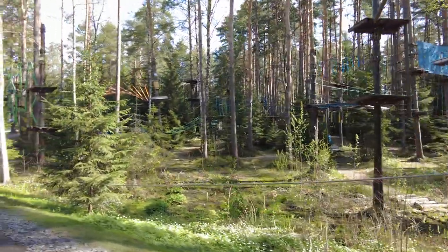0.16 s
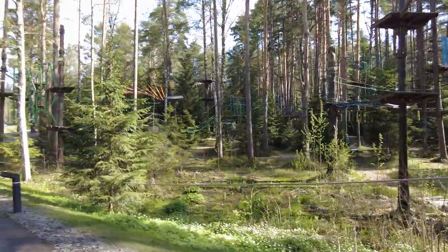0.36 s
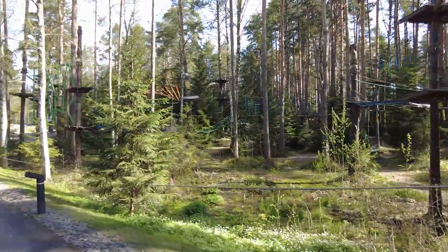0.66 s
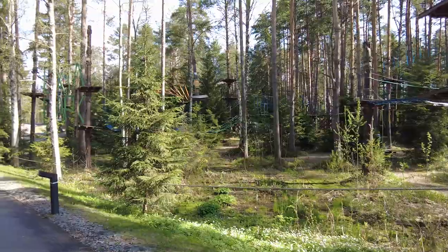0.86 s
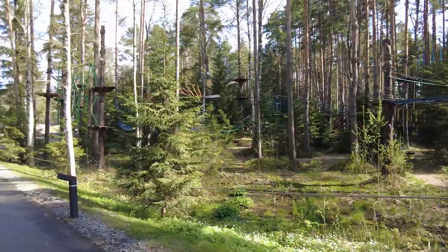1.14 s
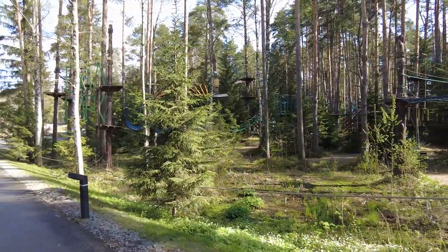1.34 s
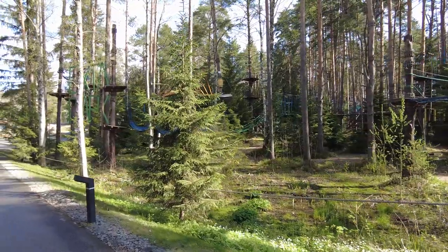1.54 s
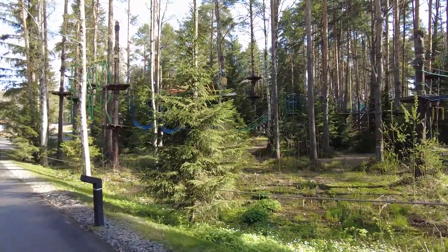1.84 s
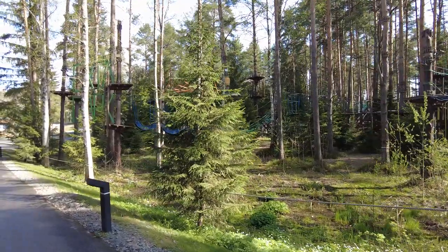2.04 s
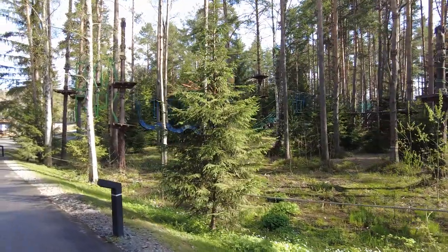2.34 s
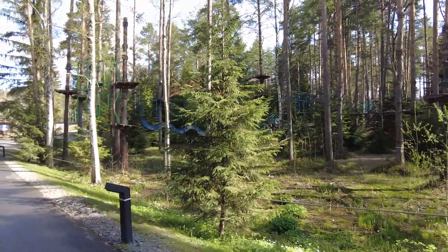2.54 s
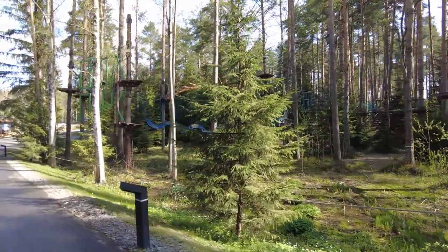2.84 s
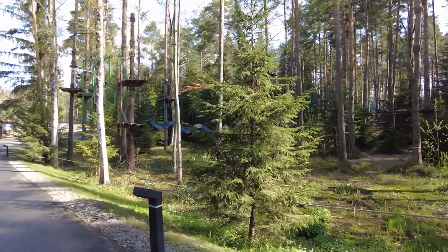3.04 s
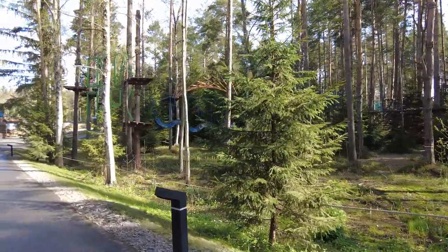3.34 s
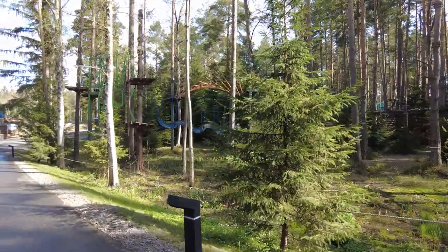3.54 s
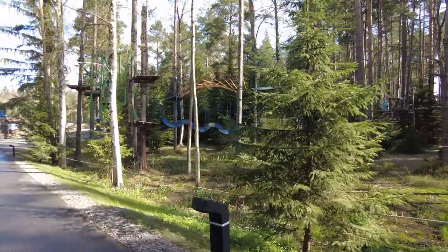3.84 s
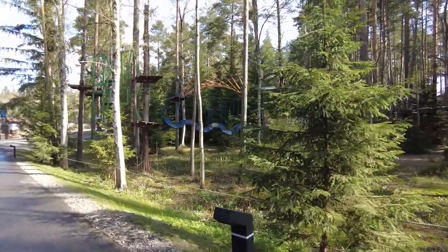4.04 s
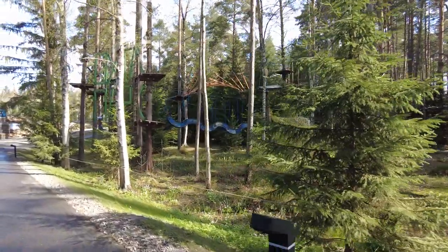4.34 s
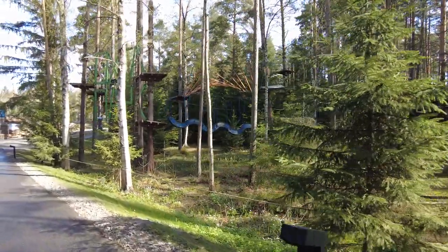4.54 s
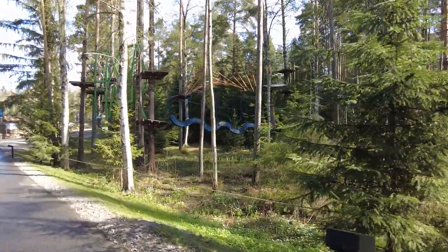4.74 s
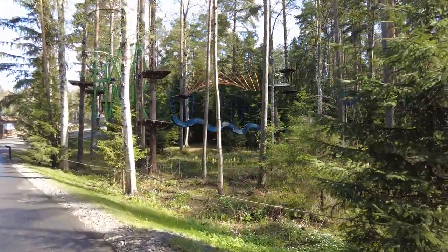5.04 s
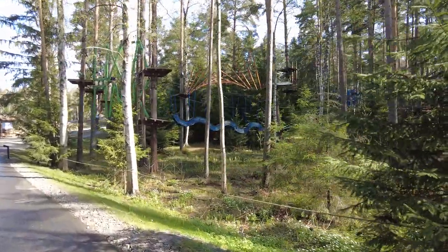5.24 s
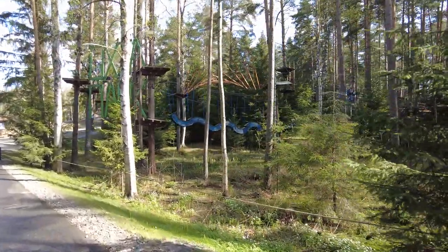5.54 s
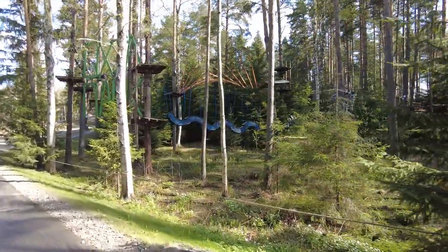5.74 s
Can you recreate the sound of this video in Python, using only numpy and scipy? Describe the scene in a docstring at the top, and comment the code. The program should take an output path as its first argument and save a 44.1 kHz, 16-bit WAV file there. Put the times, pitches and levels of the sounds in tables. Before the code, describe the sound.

Steady, quiet rubber-soled footsteps on a gritty paved path, close below the microphone, with faint cloth swishes and zips. Low wind buffeting and a drone underlie a distant tree hush. A small bird sings faintly, mostly toward the left, early on, amid dry case ticks. The wide stereo image narrows to nearly mono halfway, and later a burst of dull, low handling thumps covers the steps.

```python
"""Soft steps, two a second, cross asphalt in a pine wood: damped thuds, slaps, scrapes and cracking grit.
From the start wind noise rumbles over a drone and a far hush; a thin hiss soon dies and cloth swishes or zips.
From 1.4 s the case of a hand-held camera ticks, as damped rings, and a small bird sings in gliding tones.
The image widens, then closes nearly to mono below the treble halfway; a short hollow tone follows.
Late on, the hand slides on the case: rubbing noise and muffled knocks through its low resonances."""
import sys
import numpy as np
from scipy import signal
from scipy.fft import rfft, irfft, next_fast_len
from scipy.io import wavfile
from scipy.ndimage import uniform_filter1d, map_coordinates

SR = 44100
rng = np.random.default_rng(int(sys.argv[2]) if len(sys.argv) > 2 else 0)


def persist_wave(psi):
    """Save psi, clipped to +-1, as 16-bit WAV."""
    counts = np.round(np.clip(psi, -1, 1) * 32767).astype(np.int16)
    wavfile.write(sys.argv[1], SR, np.atleast_2d(counts).T)


N = 259749

# the hand slides on the case: (full pressure t/s, rise/s, hold/s, relative level/dB)
HAND_SLIDES = [(4.308, 0.087, 0.0044, -36), (4.65, 0.027, 0.091, -22.5), (5.164, 0.16, 0.011, -39.5)]


def amp(db):
    """Decibels to gain."""
    return 10 ** (np.asarray(db) / 20)


def unit(x):
    """Scale to rms 1."""
    return x / np.sqrt(np.mean(x ** 2) + 1e-20)


def clock():
    """Time of every sample in seconds."""
    return np.arange(N) / SR


def along(points, hz):
    """Read (f/Hz, value) points on a log frequency axis."""
    f, v = np.transpose(points)
    return np.interp(np.log(hz + 1), np.log(f + 1), v)


def curves(rows):
    """One value per sample for each column after the time."""
    s, *cols = np.transpose(rows)
    return [np.interp(clock(), s, c) for c in cols]


def filtered(x, response):
    """Multiply the spectrum of x by a response of frequency."""
    n = x.shape[-1]
    m = next_fast_len(n + 8192)
    return irfft(rfft(x, m) * response(np.fft.rfftfreq(m, 1 / SR)), m)[..., :n]


def add(track, s, sound):
    """Mix a sound into a track at time s."""
    part = track[..., max(0, round(s * SR)):][..., :sound.shape[-1]]
    part += sound[..., :part.shape[-1]]


def bell(t, half):
    """A smooth swell around t = 0."""
    return np.exp(-.5 * (t / half) ** 2)


def smooth_noise(count, size):
    """Slow random curve of rms 1: noise averaged over size samples."""
    return unit(uniform_filter1d(rng.standard_normal(count), size=size))


def wobble(rate):
    """A smooth random curve, rate knots a second."""
    return map_coordinates(rng.standard_normal(256), [clock() * rate], mode="wrap")


def spread(pair, spectrum):
    """Two unrelated signals become coloured stereo with a mid of rms 1, near mono in the bass."""
    # width of the noise layers: (f/Hz, side minus mid level/dB)
    side_width = [(60, -47.5), (150, -37.5), (360, -29), (650, -24), (1000, -20.5), (2000, -27), (4000, -3),
                  (10000, -3)]

    def mid_side_gain(hz):
        mid_db = along(spectrum, hz)
        return amp([mid_db, mid_db + along(side_width, hz)])

    mid, side = filtered(pair, mid_side_gain)
    return np.array([mid + side, mid - side]) / mid.std()


def rush(spectrum, patchy_db):
    """Stereo noise with a mid of rms 1, its level patchy over time and frequency."""
    z = signal.stft(rng.standard_normal((2, N)), nperseg=512)[2]
    field = uniform_filter1d(rng.standard_normal(z.shape[1:]), size=6, axis=0)
    field = uniform_filter1d(field, size=14, axis=1)
    noise = signal.istft(z * amp(patchy_db * unit(field)), nperseg=512)[1][:, :N]
    return spread(noise, spectrum)


def note(length, pitches, db, waver, octave_db=-40):
    """One tone gliding through evenly spaced pitches, with a quick waver and an overtone."""
    u = np.linspace(0, 1, round(length * SR))
    hz = map_coordinates(np.array(pitches, float), [u * (len(pitches) - 1)], mode="nearest")
    hz = hz * (1 + waver * smooth_noise(len(u), 40))
    phase = 2 * np.pi * np.cumsum(hz) / SR
    swell = np.abs(np.sin(np.pi * u)) ** 0.56
    return amp(db) * swell * (np.sin(phase) + amp(octave_db) * np.sin(2 * phase))


def steps(thud_hz=310, ring_t60=0.015, thud_t60=0.074, slap_t60=0.045, attack=0.0013):
    """Each contact of a rubber sole is a short damped thud and a brighter slap."""
    # heel, sole and toe meeting the asphalt: (t/s, relative thud level/dB, slap level/dB)
    contacts = [(.243, -43.5, -53), (0.275, -59, -57), (0.762, -52, -49), (.805, -53, -50.5),
                (1.23, -47.5, -57), (1.727, -50.5, -58), (1.757, -61, -55), (1.799, -54.5, -66),
                (2.222, -50.5, -63), (2.254, -53.5, -54.5), (2.721, -50, -55.5), (2.75, -54, -54),
                (2.788, -50.5, -53), (3.206, -44.5, -54), (3.241, -59.5, -53), (3.694, -59, -51.5),
                (3.707, -44.5, -59), (3.759, -51, -56), (5.2, -54, -48), (5.653, -49.5, -56)]
    thud, slap, knock = np.zeros((3, N))
    t = np.arange(SR // 4) / SR
    rise = 1 - np.exp(-t / attack)
    for s, thud_db, slap_db in contacts:
        hz = thud_hz * np.exp(0.11 * rng.standard_normal())
        add(knock, s, rise * amp(thud_db + 6.5 - 60 * t / ring_t60) * np.sin(2 * np.pi * hz * t))
        add(thud, s, rise * amp(thud_db - 2.0 - 60 * t / thud_t60))
        add(slap, s, rise * amp(slap_db - 60 * t / slap_t60))
    # noise colours: (f/Hz, relative level/dB)
    heel = rush([(80, -27.0), (250, 9.0), (450, -3.5), (900, -21), (2000, -50)], patchy_db=-1.5)
    sole = rush([(300, -4.5), (800, 14.0), (1600, -1.5), (3200, -20), (8000, -34.5)], patchy_db=0.5)
    return knock + thud * heel + slap * sole


def scuffs(grains_per_s=2200, size_db=5, scrape_db=10, slips_per_s=330, drag_db=-4):
    """Sand grains crack under the rolling sole, which scrapes in tiny slips as it lands and drags."""
    # footsteps, the feet in turn: (heel strike t/s, relative grit level/dB)
    heel_strikes = [(.243, -80.5), (.73, -74.5), (1.231, -78.5), (1.725, -75), (2.224, -76.5), (2.72, -78),
                    (3.206, -79), (3.69, -72), (4.221, -82), (4.678, -76.5), (5.168, -83), (5.653, -76)]
    # landing, then rolling: (t after the heel/s, half length/s, relative level/dB)
    roll_phases = [(0.035, 0.012, 2), (0.095, 0.024, 0)]
    # colour of the cracking sand: (f/Hz, relative level/dB)
    grit_colour = [(400, -31), (1000, 7), (2500, 8), (4000, 5.5), (5700, 1.5), (7200, -5), (9000, -13.5),
                   (12000, -32)]
    # colour of rubber dragging on asphalt: (f/Hz, relative level/dB)
    scrape_colour = [(250, -22.5), (550, -1), (900, 1.5), (1700, -8), (3200, -29), (6000, -31.5)]
    t = clock()
    landing, rolling = [
        sum(amp(grit_db + db) * bell(t - s - delay, half) for s, grit_db in heel_strikes)
        for delay, half, db in roll_phases]
    grains = (rng.random(N) < grains_per_s / SR) * rng.standard_normal((2, N))
    sand = spread(grains * amp(size_db * rng.uniform(-0.45, 1, N)), grit_colour)
    slips = (rng.random(N) < slips_per_s / SR) * rng.standard_normal((2, N))
    scrape = amp(scrape_db) * spread(slips, scrape_colour)
    return (landing + rolling) * sand + (landing + amp(drag_db) * rolling) * scrape


def crunches(attack=0.0015, width=0.11, upper=1.4, upper_db=-7, burst_db=4):
    """A larger grain breaks in a crisp, uneven spurt around its own pitch, with a weaker band above."""
    # grains crushed under the sole: (t/s, relative level/dB, f/Hz, t60/s)
    crushed_grains = [(.309, -69, 6600, .015), (.770, -64, 5530, 0.032), (1.767, -65, 5500, 0.028),
                      (2.754, -67.5, 5500, 0.037), (2.795, -70, 5600, .025), (3.722, -76, 5600, 0.05),
                      (3.881, -65.5, 7940, .012), (4.709, -72.5, 5600, .06), (5.684, -72, 5530, .04)]
    out = np.zeros((2, N))
    t = np.arange(SR // 12) / SR

    def band(f, centre):
        return 1 / (1 + ((f / centre - 1) / width) ** 2)

    for s, db, hz, t60 in crushed_grains:
        spurt = rng.standard_normal((2, len(t))) * amp(burst_db * smooth_noise(len(t), 40))
        crack = unit(filtered(spurt, lambda f: band(f, hz) + amp(upper_db) * band(f, upper * hz)))
        add(out, s, crack * (1 - np.exp(-t / attack)) * amp(db + 4.5 - 60 * t / t60))
    return out


def hollow_tone(s=3.198, hz=495, db=-55, rise=0.015, fall=0.011):
    """A short hollow sine tone peaks just before one heel strike."""
    t = clock() - s
    return amp(db) * bell(t, np.where(t < 0, rise, fall)) * np.sin(2 * np.pi * hz * t)


def swishes():
    """Faint airy noise swells, as of cloth brushing past."""
    # (middle t/s, half length/s, level/dB)
    brushes = [(0.34, 0.019, -78.5), (4.943, 0.035, -75.5), (5.76, 0.051, -80)]
    # colour of the cloth: (f/Hz, relative level/dB)
    cloth_colour = [(1500, -22), (3500, 8.5), (5500, 3.5), (8500, -13.5), (11500, -11)]
    t = clock()
    swell = sum(amp(db) * bell(t - s, half) for s, half, db in brushes)
    return swell * rush(cloth_colour, patchy_db=5.0)


def zips(waver=0.026, octave_db=-13.5):
    """Ribs of cloth run over each other in a rough little whistle."""
    # (t/s, length/s, start f/Hz, middle f/Hz, end f/Hz, level/dB)
    cloth_zips = [(0.84, 0.072, 3600, 3960, 4100, -77.5), (2.77, 0.066, 3800, 3920, 3850, -88),
                  (3.807, .055, 3650, 4000, 4020, -70.5), (4.765, 0.056, 3740, 3880, 3310, -73.5),
                  (4.81, 0.049, 3320, 3850, 3400, -74)]
    out = np.zeros(N)
    for s, length, *pitches, db in cloth_zips:
        add(out, s, note(length, pitches, db, waver, octave_db))
    return out


def pressure(t, rise_db=30, fade_db_per_s=143):
    """Gain of the sliding hand at times t: each slide rises, holds and fades."""
    total = 0
    for s, rise, hold, db in HAND_SLIDES:
        rising_db = rise_db * np.maximum(s - t, 0) / rise
        fading_db = fade_db_per_s * np.maximum(t - s - hold, 0)
        total = total + amp(db - rising_db - fading_db)
    return total


def catches(count=12, per_s=42, catch_db=-1.5, span_s=0.081):
    """The skin catches at uneven intervals as it slides, knocking as hard as the pressure allows."""
    rows = []
    for s, _, hold, _ in HAND_SLIDES:
        after = np.cumsum(rng.uniform(0.55, 1.7, count)) / per_s
        for at in s + after[after < hold + span_s]:
            rows.append((at, 20 * np.log10(pressure(at)) + catch_db))
    return rows


def handling(lead=0.00288, typical_hz=420, rub_db=-9):
    """The hand rubs and knocks; soft skin excites only the low resonances of the case."""
    # clearest knocks: (t/s, relative peak level/dB, reach f/Hz, higher for a harder knock)
    clear_knocks = [(2.605, -34, 211), (4.310, -26, 323), (4.332, -30, 270), (4.391, -31, 260),
                    (4.649, -27, 440), (4.655, -17.5, 262), (4.677, -19.5, 248), (4.682, -23.5, 840),
                    (4.693, -23.5, 300), (4.707, -20.5, 250), (4.718, -12.5, 530), (4.742, -22.5, 382),
                    (4.763, -29, 556), (4.777, -19.5, 520), (4.80, -24, 260), (4.822, -21, 423),
                    (4.875, -26, 520), (4.88, -28.5, 378), (4.893, -26.5, 260), (5.114, -33, 420),
                    (5.166, -26, 295), (5.19, -27.5, 325)]
    # resonances of the case: (f/Hz, width/Hz, level/dB)
    case_modes = [(126, 54, 1.5), (185, 39, -3), (289, 42, -7.5), (453, 30, -11.5)]
    # colour of the rubbing: (f/Hz, relative level/dB)
    rub_colour = [(40, -23.5), (70, 2.5), (100, -0.5), (130, 5), (160, -3), (197, 3.5), (240, -5),
                  (300, -11.5), (460, -22.5), (580, -26), (1200, -53.5), (2500, -110)]
    t = np.arange(SR // 6) / SR
    knocks = np.zeros(N)

    def body(f):
        return sum(amp(db) * 1j * f * w / (c * c - f * f + 1j * f * w) for c, w, db in case_modes)

    small_knocks = [(s, db, typical_hz) for s, db in catches()]
    for s, db, reach_hz in list(clear_knocks) + small_knocks:
        push = np.exp(-(np.pi * reach_hz * (t - lead)) ** 2)  # a harder knock is a shorter push
        knock = filtered(push, body)
        add(knocks, s - .002, -amp(db - 2.2) * knock / np.abs(knock).max())
    return knocks + amp(rub_db) * pressure(clock()) * rush(rub_colour, patchy_db=-1.0)


def ticks(crack_t60=0.0069):
    """Plastic of the case slips: a tiny noise crack and one quickly damped ring."""
    # (t/s, relative level/dB, ring f/Hz, ring t60/s, crack relative to ring/dB)
    case_ticks = [(1.385, -36.5, 2480, 0.0035, -2), (1.422, -50.5, 4270, .008, -16),
                  (1.530, -42, 3200, 0.01, -26), (1.5365, -43.5, 3120, 0.013, -15),
                  (1.557, -44.5, 2700, 0.0056, -3), (2.161, -42, 4370, 0.011, -5),
                  (2.161, -40.5, 1600, 0.0091, -1), (4.575, -47, 2340, 0.011, -3)]
    rings, cracks = np.zeros((2, N))
    t = np.arange(SR // 20) / SR
    for s, db, hz, t60, crack_db in case_ticks:
        add(rings, s, amp(db - 3.0 - 60 * t / t60) * np.sin(2 * np.pi * hz * t))
        add(cracks, s, amp(db + crack_db - 10.5 - 60 * t / crack_t60) * rng.standard_normal(len(t)))
    # crack filter: (f/Hz, gain/dB)
    snap = [(400, -11), (1200, -9), (2300, 13), (4500, 3), (7000, -14), (13000, -8)]
    return rings + filtered(cracks, lambda hz: amp(along(snap, hz)))


def bird(flutter_db=4.0, whistle_waver=0.007, buzz_waver=0.018):
    """Peaked whistles step down in pitch and end in upward sweeps; other calls are buzzy."""
    # peaked whistles: (peak t/s, length/s, top f/Hz, relative level/dB)
    whistles = [(1.42, 0.089, 6000, -81), (1.556, 0.094, 5900, -80), (1.692, 0.048, 4950, -76.5),
                (1.788, 0.046, 4700, -77), (1.878, 0.045, 4740, -71.5), (1.971, .066, 4630, -78),
                (2.074, 0.055, 4630, -76)]
    # sweeps that end the song: (t/s, length/s, relative level/dB)
    end_sweeps = [(2.172, .1, -75.5), (2.351, 0.16, -84)]
    # evenly spaced pitches of each sweep: f/Hz
    sweep_pitches = (3200, 3300, 3950, 4470, 4580, 5100, 5200)
    # calls of other birds: (t/s, length/s, start f/Hz, middle f/Hz, end f/Hz, relative level/dB)
    buzzy_calls = [(2.55, 0.12, 4340, 3950, 3580, -81), (4.925, 0.076, 6350, 6360, 6750, -83)]
    slope, lean = 40000, 4100  # Hz/s: steep flanks, the fall steeper than the rise
    tip = 0.007  # s, half width of the rounded top
    out = np.zeros(N)
    for s, length, top_hz, db in whistles:
        t = np.linspace(-length / 2, length / 2, 15)
        pitches = top_hz - slope * (np.hypot(t, tip) - tip) - lean * t
        add(out, s - length / 2, note(length, pitches, db, whistle_waver))
    for s, length, db in end_sweeps:
        add(out, s, note(length, sweep_pitches, db, whistle_waver))
    for s, length, *pitches, db in buzzy_calls:
        add(out, s, note(length, pitches, db, buzz_waver))
    # paths around the trunks interfere, so the level flutters
    return out * amp(flutter_db * smooth_noise(N, 300))


def trunks(x):
    """The trees scatter a short diffuse echo: decaying stereo noise convolved with the sound."""
    # echo among the trunks: (f/Hz, t60/s)
    echo_decay = [(200, 0.22), (2000, 0.14), (10000, 0.24)]
    hz, t, z = signal.stft(rng.standard_normal((2, SR // 2)), SR, nperseg=256)
    decay = amp(-60 * t / along(echo_decay, hz)[:, None])
    tail = signal.istft(z * decay, SR, nperseg=256)[1]
    return signal.fftconvolve(x[None], tail / np.linalg.norm(tail[0]), axes=1)[:, :N]


def wind_rumble(gust_db=1.5, gusts_per_s=7.14):
    """Wind buffets the microphone: deep noise with slow swells and quick random swings."""
    # (t/s, level/dB)
    buffet_level = [(0, -52), (.7, -46.5), (1.05, -41), (1.28, -42.5), (1.6, -38.5), (2.15, -35.5),
                    (2.45, -43.5), (2.84, -42.5), (3.02, -54.5), (4.5, -45.5), (4.67, -50), (5.15, -42),
                    (5.5, -56), (5.89, -48)]
    # (f/Hz, relative level/dB)
    buffet_colour = [(8.8, -31.5), (15, -19.5), (32, 0), (70, -1), (91, -34.5), (150, -120)]
    level_db = curves(buffet_level)[0] + gust_db * wobble(gusts_per_s)
    return amp(level_db) * rush(buffet_colour, patchy_db=0.5)


def low_drone():
    """Steady-grained low noise whose level drifts."""
    # (t/s, level/dB)
    drone_level = [(0, -50), (.75, -47), (1.05, -47), (1.3, -48), (1.7, -48.5), (2.12, -43.5),
                   (2.85, -45.5), (4.3, -45), (5.15, -45), (5.89, -49)]
    # (f/Hz, relative level/dB)
    drone_colour = [(26, -40.5), (45, -6), (75, 1.5), (89, -2), (108, -9.5), (135, -10), (147, -11.5),
                    (167, -25.5), (300, -34), (390, -48.5), (660, -120)]
    return amp(curves(drone_level)[0]) * rush(drone_colour, patchy_db=0)


def far_hush():
    """The far hush of the trees: a low murmur and a brighter leaf hiss, both patchy noise."""
    # (t/s, relative hush level/dB, relative leaf hiss level/dB)
    air_level = [(0, -63.5, -70.5), (1.15, -66, -71.5), (1.74, -66, -70), (2.38, -66, -67.5),
                 (2.71, -69, -69.5), (2.94, -63.5, -70.5), (4.79, -62, -71), (5.41, -64.5, -70.5),
                 (5.89, -63.5, -70.5)]
    # (f/Hz, relative level/dB)
    hush_colour = [(110, -11.5), (190, 2), (327, -3), (388, -0.5), (451, -4.5), (605, -4), (705, -6.5),
                   (770, -5.5), (1600, -17), (2080, -43), (3520, -120)]
    # (f/Hz, relative level/dB)
    leaf_colour = [(650, -18.5), (1100, -5), (1200, -8.5), (1620, -6), (1760, -7), (2120, -10), (2400, -12),
                   (3630, -17.5), (3950, -20), (5680, -25.5), (6920, -30.5), (12100, -32.5), (13200, -35.5)]
    hush_db, leaf_db = curves(air_level)
    hush = amp(hush_db + 0.5) * rush(hush_colour, patchy_db=1.5)
    return hush + amp(leaf_db - 1.0) * rush(leaf_colour, patchy_db=1.8)


def swelling_band(centre_hz=1290, width_hz=110, full_db=-76):
    """A narrow band of noise within the hush swells for a while."""
    swell = np.interp(clock(), [.6, 1.7, 2.5, 2.8], [0, 1, 1, 0])
    noise = rng.standard_normal(N)
    band = unit(filtered(noise, lambda hz: 1 / (1 + ((hz - centre_hz) / width_hz) ** 2)))
    return amp(full_db) * swell * band


def thin_hiss(db=-84, end=0.34, fade=.04):
    """A steady, thin sizzle of noise, mainly in two high bands, dies away early on."""
    # (f/Hz, relative level/dB)
    sizzle_colour = [(4600, -16), (5800, 1), (6900, -24), (9800, -22), (10700, -4.5), (12500, -20.5)]
    gate = (1 - np.tanh((clock() - end) / fade)) / 2
    return amp(db) * gate * rush(sizzle_colour, patchy_db=-1.5)


def scene():
    """Feet, clothes and camera are near, the feet with a faint echo; the birds sing off to one side."""
    feet = steps() + scuffs() + crunches() + hollow_tone()
    song = bird()
    echo = trunks(amp(-31.0) * feet.mean(axis=0) + amp(-5.5) * song)
    near = feet + swishes() + zips() + handling() + ticks()
    placed_song = song * amp([[1.5], [-4]])  # left and right gain/dB
    background = wind_rumble() + low_drone() + far_hush() + swelling_band() + thin_hiss()
    return near + placed_song + echo + background


def record(dry, treble_hz=3100, top_hz=13200):
    """The image opens and then closes below the treble; nothing passes above the top limit."""
    # width of the image below the treble: (t/s, side gain/dB)
    image_width = [(0, 3), (.5, 10.5), (1.4, 16.5), (2.2, 20), (2.7, 21.5), (2.87, 9), (3.0, -13)]
    mid, side = (dry[0] + dry[1]) / 2, (dry[0] - dry[1]) / 2
    low_side = filtered(side, lambda hz: hz < treble_hz)
    side = side + low_side * (amp(curves(image_width)[0]) - 1)
    return filtered(np.array([mid + side, mid - side]), lambda hz: hz < top_hz)


dry = scene()
out = record(dry)
persist_wave(out)
```